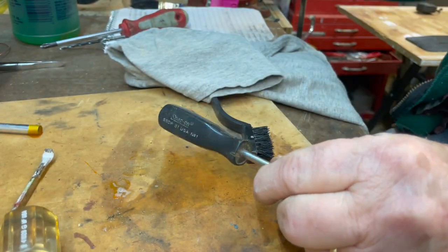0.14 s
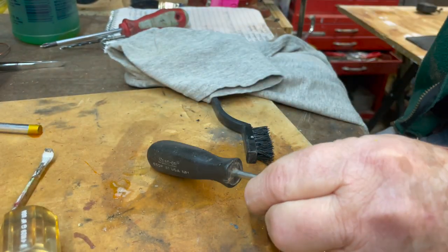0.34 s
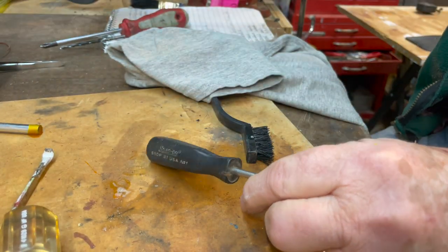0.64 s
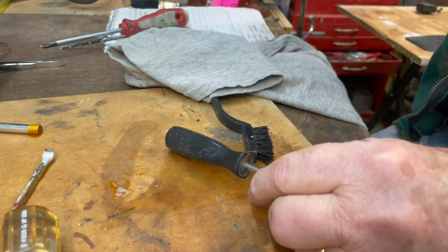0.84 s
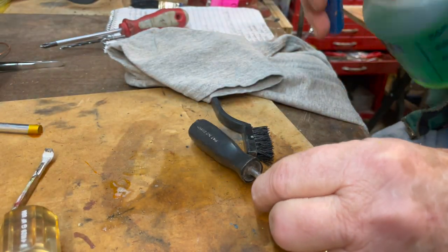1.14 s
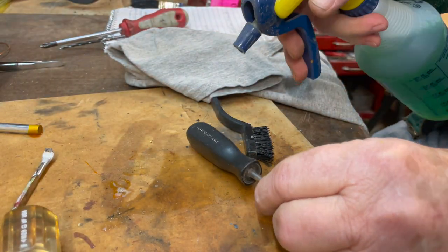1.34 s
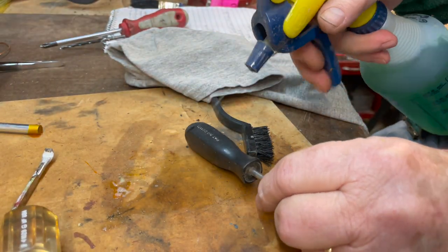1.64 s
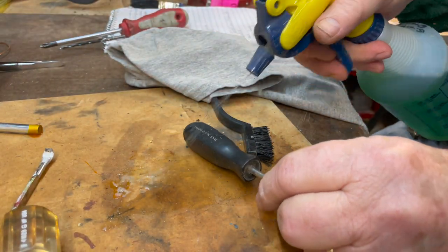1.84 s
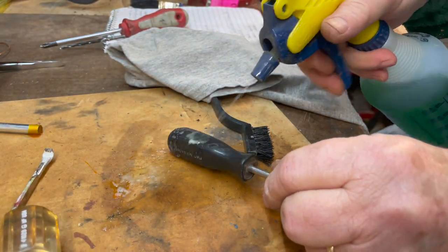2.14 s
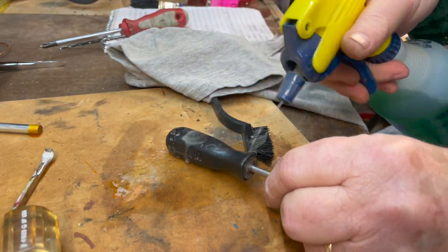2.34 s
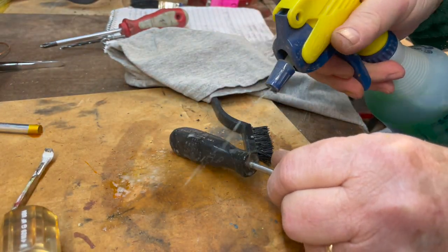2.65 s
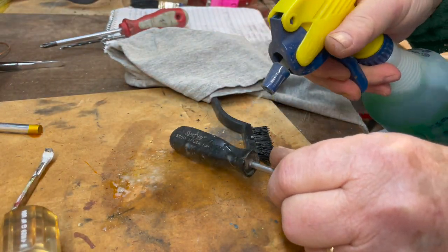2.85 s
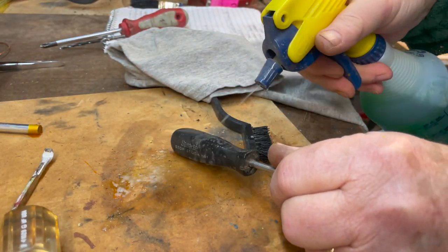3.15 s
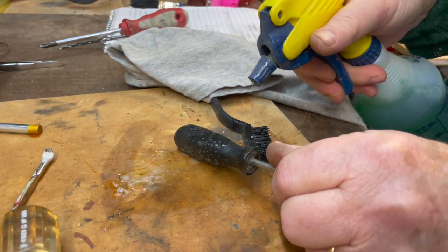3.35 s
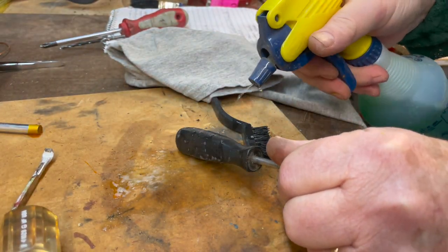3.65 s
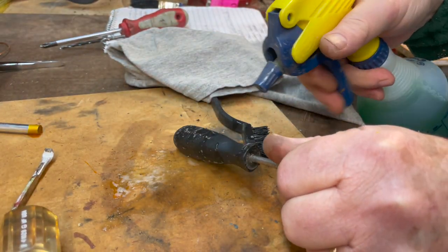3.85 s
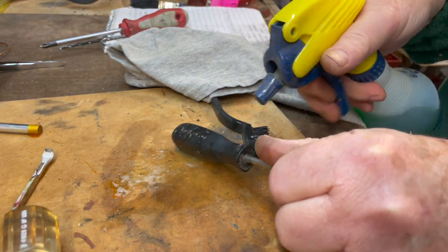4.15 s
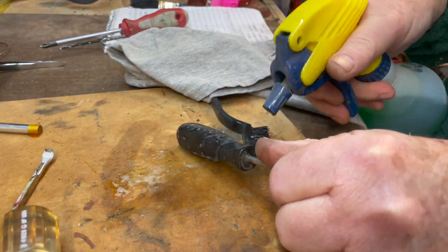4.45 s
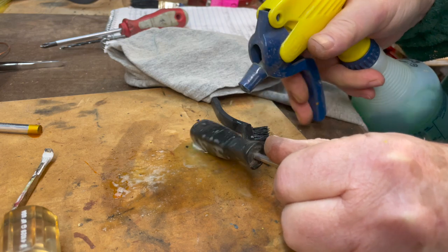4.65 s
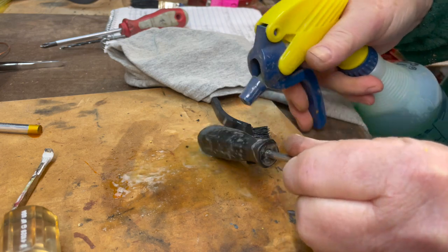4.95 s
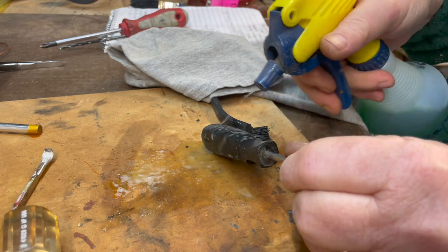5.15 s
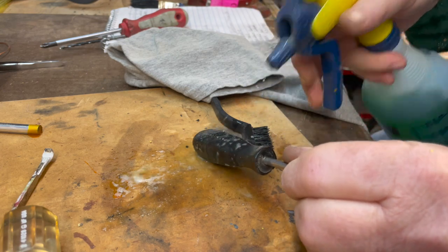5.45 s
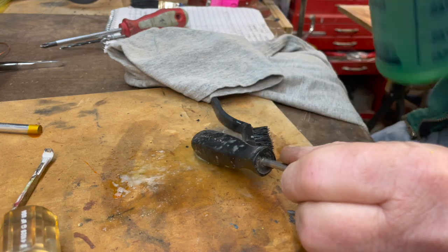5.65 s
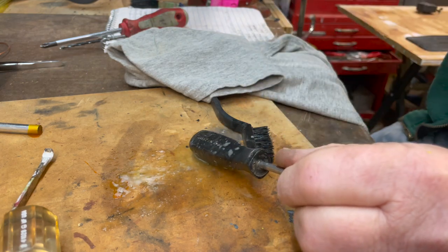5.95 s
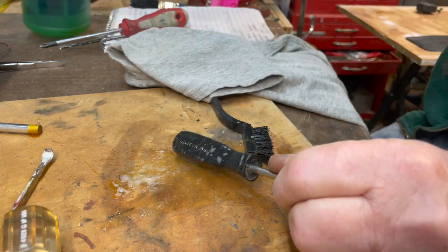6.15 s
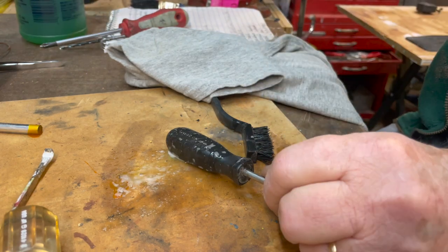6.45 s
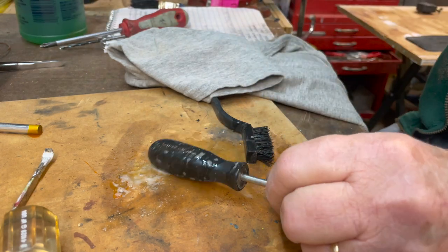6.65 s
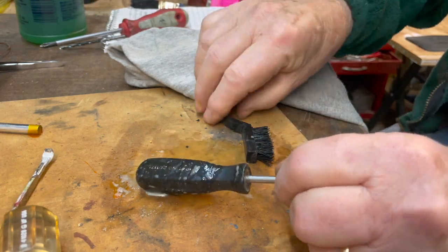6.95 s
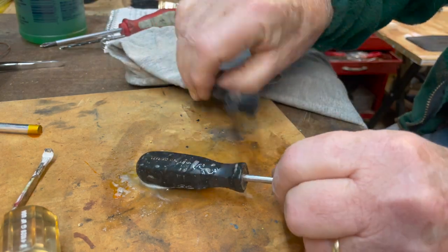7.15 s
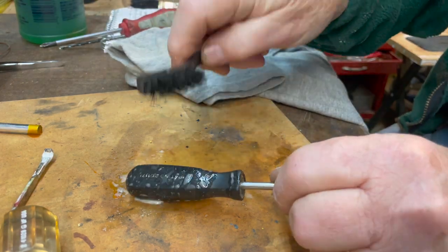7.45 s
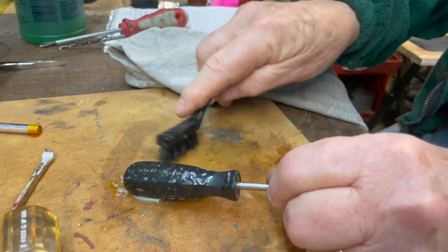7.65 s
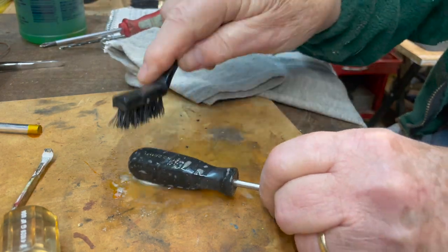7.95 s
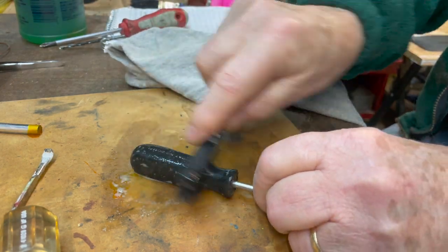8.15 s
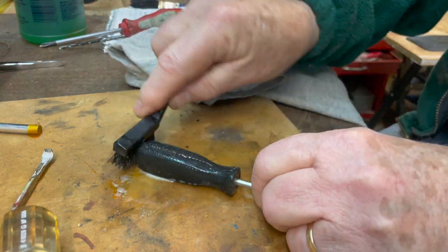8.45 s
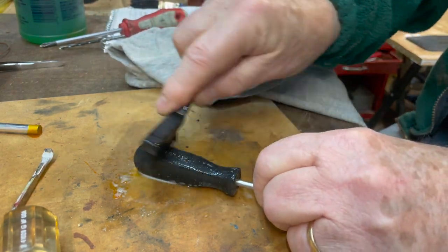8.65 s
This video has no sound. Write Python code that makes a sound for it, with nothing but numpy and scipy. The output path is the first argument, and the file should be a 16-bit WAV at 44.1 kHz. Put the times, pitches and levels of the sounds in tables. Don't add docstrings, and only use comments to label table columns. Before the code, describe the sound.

In a humming workshop, a trigger bottle squirts repeated hissing bursts with plastic clicks, is set down with a rattling thud, then a stiff brush scrubs.

```python
import sys
import numpy as np
from scipy import signal
from scipy.fft import rfft, irfft, next_fast_len
from scipy.io import wavfile
from scipy.ndimage import uniform_filter1d

SR = 44100
rng = np.random.default_rng(int(sys.argv[2]) if len(sys.argv) > 2 else 0)


def unload_audio(sound):
    columns = np.transpose(np.atleast_2d(sound))
    steps = np.round(np.clip(columns, -1, 1) * 32767)
    wavfile.write(sys.argv[1], SR, steps.astype(np.int16))


def boost(x):
    u = np.asarray(x, float) / 20
    return 10 ** u


N = 388521
SIZE = next_fast_len(N + SR)
HZ = np.arange(SIZE // 2 + 1) * SR / SIZE + 1e-3
TIME = np.arange(N) / SR

# pitch_hz, peak_db, phase_rad
MOTORS = [
    (56.53, -43.7, -2.74),
    (59.37, -56, .52),
]
# pitch_hz, level_db_per_hz
FAN = [(35, -100), (48, -67.5), (90, -73), (125, -86), (170, -76), (250, -82), (420, -79.5), (700, -83),
       (1500, -87), (3000, -98), (4000, -105), (7000, -113), (13000, -113), (16000, -120)]
# pitch_hz, width_hz, level_db
DUCT_RESONANCES = [(302.5, 62, 11.04), (342.5, 28, 11.7), (500, 24, 6.3), (1100, 460, 2.05),
                   (3220, 140, 5.9)]
ROOM_T60_S, ROOM_DB = 0.18, -7.5

# pitch_hz, right_leads_left_rad,
# likeness_0_to_1, left_minus_right_db
MICS = [(60.4, 0.42, 1, -1), (200, 0.3, 0.93, 1), (487, -0.9, 0.82, 1), (930, -2.5, 0.46, 0.5),
        (2980, -2, 0.7, 2.5), (4110, -1.98, 0.87, 3), (5880, -0.5, 0, 3.5), (7470, 4, 0.48, 2.5),
        (8400, 3.6, .8, 0), (9200, 3.14, .97, 0), (9900, 3.6, .8, 0), (10800, 4.2, .75, 0),
               (12000, 5.4, .85, 0), (12800, 2 * np.pi, .99, 0), (17000, 2 * np.pi, .99, 0)]
# pitch_hz, width_hz, level_db
CASE_DIPS = [(5700, 300, -9), (7500, 350, -6)]

# start_s, length_s, rub_db, brightness_db, fastest_place_0_to_1
RUSTLES = [(0, .06, -74, 0.1, .1), (0.206, .08, -68, 1, 0.3), (0.308, 0.076, -60, 3, 0),
           (0.381, 0.18, -58.5, -5, 0.14), (.76, 0.63, -68.5, -9, 0.2), (1.05, 0.3, -67, -4.5, 0.8),
           (5.7, .22, -86, -15, 0.1), (6.185, 0.13, -47, -4.5, 0), (6.284, 0.51, -66.5, 1, 0.42),
           (6.657, 0.13, -56, -10, 0.28), (6.965, 0.079, -50.5, 1, 0.75), (7.082, 0.25, -63, 0.5, 0.52),
           (7.292, 0.14, -58, -9, 0.55), (7.448, 0.13, -63.5, -5, 0.4), (7.61, 0.34, -63, -3, 0.4),
           (7.894, 0.13, -61.5, -4, 0.34), (8.05, 0.9, -62, -3, 0.44)]
# pitch_hz, level_db
CLOTH_COLOUR = [(300, -16), (600, -10.5), (1200, -15), (2200, -18), (4500, -15.5), (8500, -12.5),
                (15600, -9), (16200, -40)]
RUSTLE_ARCH = -11.5, -27, 0.0043
DRAG_DB, DRAG_PER_BRIGHT = 2, -0.59

# start_s, peak_db
NUDGES = [
    (2.56, -47.5),
    (3.219, -48),
    (4.929, -47),
    (5.091, -41),
    (6.665, -50),
    (7.122, -53),
    (4.35, -51.5),
]
NUDGE_SHARED = -49, 2.4, 0.87

# start_s, peak_db, upper_band_db, direct_minus_other_paths_db, ring_length_factor
KNOCKS = [
    (0.3222, -9.5, -22, 0, 1.5),
    (0.3635, -26, -75, 4.5, 1.0),
]
# start_s, peak_db, upper_band_db, direct_minus_other_paths_db, ring_length_factor
TAPS = [
    (1.012, -22.5, -39, 3, 1.1),
    (7.01, -35, -52, 2, 0.28),
    (7.681, -36, -56, 10, 4.2),
    (8.036, -32.5, -55, 6.4, 3.7),
]
# pitch_hz, level_db_per_hz
BENCH_TOP = [(59, -6), (100, -15), (420, -30), (550, 0), (800, -8), (1140, -5.5), (1400, -5.5), (2030, -14),
             (2360, -28), (2960, -12), (3400, -25), (5020, -23), (9000, -39), (11700, -64), (19800, -120)]
# pitch_hz, level_db_per_hz
BENCH_EDGE = [(150, -25), (400, -11), (530, 1.5), (750, -6.5), (1100, -1.5), (1500, -6.5), (2100, -13.5),
              (3000, -21), (4500, -28), (9000, -49)]
# start_s, left_db, right_db, pitch_hz
CONTACTS = [
    (0.3224, -3, -9, 1340),
    (0.3642, -22, -29, 1300),
    (1.0128, -15, -26, 1230),
    (8.4682, -12, -16, 1690),
]
CONTACT_CYCLES, FAR_PITCH = 1.23, 2.03

# start_s, length_s, bristle_hiss_db, pressure_db, fastest_place_0_to_1
STROKES = [
    (7.644, 0.16, -37, -41, 0.65),
    (8.028, 0.098, -40, -51.5, 0.33),
    (8.145, 0.13, -41.5, -50, 0.44),
    (8.259, 0.097, -36.5, -49.5, 0.3),
    (8.366, 0.11, -36, -50, 0.68),
    (8.485, 0.1, -35.5, -50, 0.32),
    (8.593, 0.094, -41.5, -54, 0.75),
    (8.701, 0.1, -40, -53.5, 0.33),
]
# pitch_hz, level_db
BRISTLE_COLOUR = [(120, -2), (300, -18), (550, -4.5), (1200, -18), (2200, -18), (3300, -19), (4500, -11),
                  (7000, -9.5), (10800, -7.5), (12300, -4), (13600, 4), (15750, 0.5), (16150, -48)]
STROKE_ARCH, DRUM_DB = (-13.5, -16, 0.0088), 3  # (start_db, end_db, edge_s), handle drumming over pressure
# start_s, peak_db, upper_band_db, direct_minus_other_paths_db, ring_length_factor
CLACK = [
    (8.467, -15, -18.5, 2.1, 1.14),
]
# pitch_hz, level_db_per_hz
HANDLE = [(180, -41), (300, -19), (603, -1), (910, -15), (1230, 3.5), (1880, -9), (2330, -0.5), (3180, -17),
          (5090, -11), (9000, -31), (11700, -69), (19800, -120)]

# start_s, peak_db, upper_band_db, direct_minus_other_paths_db, ring_length_factor
THUDS = [
    (6.1925, -20, -27.5, 3, 0.38),
    (6.198, -17.5, -24.5, 2, 0.29),
    (6.204, -18.5, -23, 1.5, 0.68),
    (6.215, -17.5, -29, 1.8, 0.58),
    (6.225, -27, -35, 1.6, 0.45),
    (6.232, -32, -43, 2, 0.46),
    (6.272, -25, -60, 3.6, 0.7),
]
# start_s, peak_db, upper_band_db, direct_minus_other_paths_db,
# ring_length_factor
ROCKS = [
    (6.238, -29, -30, 2, 0.55),
    (6.247, -27, -35, 2, 1),
    (6.255, -24.5, -36, 2.7, 0.93),
    (6.263, -23.5, -40, 3.3, .7),
    (6.281, -33, -46, 3, .9),
    (6.298, -35, -49, 2, 1),
    (6.313, -36, -51, 2, .9),
    (6.334, -43, -52, 2, .9),
]
# pitch_hz, level_db_per_hz
BOTTLE = [(41, -32), (70, -8.5), (152, 0.5), (378, -12.5), (492, -4), (600, -15), (800, -5.5), (1000, -6.5),
          (1360, -12.5), (1480, -23), (1700, -18), (2710, -28.5), (9000, -44.5), (11700, -71),
          (19800, -120)]
# pitch_hz, level_db_per_hz
RIM = [(120, -25), (300, -5), (600, -7), (1000, -4), (1400, -5.5), (2000, -13), (3200, -17), (5000, -27),
       (9000, -45)]

# start_s, peak_db, upper_band_db, direct_minus_other_paths_db
TICKS = [(1.6056, -32.5, -35.5, -1), (1.7335, -37.5, -48, 1), (1.8547, -30.5, -32, -7),
         (2.123, -36, -38, -8), (2.2523, -39, -43, -1), (2.387, -41, -45, -11), (2.5296, -34, -43, -7),
         (2.6606, -37, -47, -12), (2.9137, -49, -65, -7), (3.1754, -38, -46, -6), (3.4246, -38.5, -62, -3),
         (3.5687, -39.5, -52, 4), (2.2755, -44, -49, -6), (2.55, -50, -50, -5), (2.9332, -54, -58, -5),
         (3.36, -47, -45, -3), (3.5378, -46, -42.5, 5), (3.5957, -41, -45, 4), (4.2671, -52, -42, -5),
         (4.65, -56, -48, 0), (5.385, -44, -44, 2), (1.6095, -40, -40, -2), (3.711, -50, -63, 1),
         (3.9759, -47, -40.5, -4), (4.2547, -38, -46, -12), (4.3844, -52, -46, 5), (4.5468, -34, -37.5, -1),
         (4.6884, -33.5, -42.5, 3), (4.8612, -31, -38.5, 3), (5.0115, -41, -44, -3),
         (5.1327, -36.5, -44, -3), (5.37, -35, -40, -1), (5.475, -27, -29.5, -2), (5.7089, -45, -57, -1),
         (7.1856, -35, -42.5, 3)]
# pitch_hz, level_db_per_hz
TRIGGER = [(1300, 0.5), (1750, 2), (2000, 6.5), (2300, -1), (3200, -5), (4000, -6.5), (5000, -3),
           (5500, -25), (5900, -30)]
# start_s, peak_db, upper_band_db,
# direct_minus_other_paths_db
SNAPS = [(0.2226, -60, -56, 4), (0.763, -34, -34.5, 2), (0.9622, -44.5, -48, 1), (2.2672, -36, -26.5, -5),
         (3.7346, -44, -45, -8), (3.8531, -31.5, -31.5, -4), (4.138, -33.5, -22.5, -7),
         (4.564, -38, -43, -2), (4.714, -31.5, -28, -3), (5.024, -34.5, -27.5, -2), (5.4557, -45, -48, -6),
         (5.5718, -39.5, -31, 8), (6.6286, -35, -67, -1), (6.6663, -41, -49, -4), (6.9702, -43.5, -52, 5),
         (7.6131, -29, -36, -5), (7.6475, -31, -51, -6), (8.0336, -36, -35, -4), (8.0944, -56, -33, -1),
         (8.2665, -36, -32, -1), (8.3809, -49, -32, 1.5), (8.5864, -55, -32.5, 2.5),
         (8.7071, -43, -30.5, -1), (7.63, -50, -50, -4), (7.6795, -31, -46, -3), (7.808, -44, -38, 0),
         (8.075, -57, -38, 0), (8.245, -50, -38, 0), (8.2767, -36, -39, 3), (8.44, -52, -38, 0),
         (8.455, -45, -40, 0), (8.61, -52, -35, 0), (8.682, -46, -36, 0), (8.695, -53, -46, 0),
         (2.275, -40, -38, -5), (4.146, -38, -36, 1), (5.462, -41, -43, -2), (5.476, -39, -36.5, -6)]
# pitch_hz, level_db_per_hz
PLASTIC = [(1500, 4), (2500, 6.5), (4500, 0.5), (6500, 6.5), (8500, 3.5), (11000, -3), (13000, 1),
           (15000, -9), (16500, -17)]
TICK_RING, SNAP_RING = 0.72, 1.2
# start_s, peak_db, upper_band_db, direct_minus_other_paths_db, ring_length_factor
LATCH = [
    (1.478, -13.5, -14.5, 0.86, 0.74),
    (1.4854, -27.5, -26, 3, 1.5),
]
# pitch_hz, level_db_per_hz
LOCK = [(240, -29), (400, -25), (545, -5.5), (801, -21), (1220, -10), (1510, -19), (1930, -8), (2600, -9.5),
        (3400, -0.5), (4400, -6.5), (5780, -19), (8760, -8), (11900, -5), (16000, -9)]
# start_s, peak_db
VALVE = [(1.6057, -57), (1.8542, -52), (2.1231, -49), (2.3875, -47), (2.6604, -50), (2.9133, -50),
         (3.1744, -59), (3.4251, -50), (3.711, -48), (3.9759, -51), (4.2557, -52), (4.5466, -54),
         (4.8614, -57)]
# pitch_hz, level_db_per_hz
CHAMBER = [(1850, -11.5), (2000, 1), (2200, -6), (2350, -4), (2600, -23)]
VALVE_SHARED = -72, .1, 1.3

# start_s, length_s, nozzle_hiss_db, splash_db, hardest_place_0_to_1
SQUIRTS = [(1.472, 0.096, -56, -49, 0.1), (1.504, 0.25, -49.5, -61.5, 0.35), (1.742, 0.15, -39, -56, 0.62),
           (1.836, 0.15, -47, -55, 0.2), (1.997, 0.27, -44.5, -57.5, .35), (2.267, 0.28, -50, -59, .35),
           (2.523, 0.28, -52, -58, 0.47), (2.789, 0.22, -44.5, -59, 0.45), (3.054, .21, -48.5, -59, 0.57),
           (3.305, 0.32, -62.5, -59.5, 0.25), (3.567, 0.36, -60, -63, 0.33),
           (3.843, 0.31, -57, -62.5, 0.42), (4.134, 0.22, -48.5, -63.5, 0.57), (4.365, 0.1, -68, -64, 0.5),
           (4.423, 0.21, -63, -62, 0.3), (4.6, 0.14, -65, -63, 0.3), (4.713, 0.14, -59, -62, 0.5),
           (4.811, 0.16, -55.5, -60.5, .5), (4.928, 0.086, -61, -63, 0.6), (5.022, 0.21, -63, -65.5, 0.64),
           (5.24, 0.11, -64, -63, 0.45), (5.332, .15, -60, -64.5, 0.3), (5.47, 0.097, -68, -61, 0.3),
           (5.563, 0.12, -78, -64, 0)]
# pitch_hz, level_db
MIST_COLOUR = [(2500, -2.5), (4500, -11.5), (7000, -11.5), (10500, -11.5), (11500, -14.5), (12600, -6.5),
               (13600, -7.5), (14600, -8), (15750, -4), (16150, -53)]
HISS_ARCH = -10, -30, 0.043
SPLASH_ARCH = -11, -14.5, 0.016


def unit(x):
    return x / np.sqrt(np.mean(x ** 2))


def along(points, column=1):
    rows = np.array(points, float)
    return np.interp(np.log(HZ), np.log(rows[:, 0]), rows[:, column])


def bells(peaks):
    return sum(db / (1 + (2 * (HZ - hz) / width) ** 2) for hz, width, db in peaks)


def shape(x, gain):
    return irfft(rfft(x, SIZE) * gain, SIZE)[..., :N]


def above(hz):
    return 1 / (1 + (hz / HZ) ** 8)


def walk(rate):
    hold = int(SR / rate)
    steps = np.repeat(rng.standard_normal(N // hold + 1), hold)
    smooth = uniform_filter1d(uniform_filter1d(steps, hold), hold)
    return unit(smooth[:N])


def swells(rows, levels_db, start_db, end_db, edge_s):
    gains = np.zeros((len(levels_db), N))
    for (s, length, *_, place), db in zip(rows, np.transpose(levels_db)):
        span = slice(max(int(s * SR), 0), int((s + length) * SR))
        u = (TIME[span] - s) / length
        place = np.clip(place, .1, .9)
        rise = start_db * (1 - u / place) ** 2
        fall = end_db * ((u - place) / (1 - place)) ** 2
        arch = np.where(u < place, rise, fall)
        edges = np.clip(np.minimum(u, 1 - u) * length / edge_s, 0, 1)
        gains[:, span] += boost(db)[:, None] * boost(arch) * edges
    return gains


def friction(gains, colour, rate, spread_db, patchy_db):
    size = (rng.random(N) < rate / SR) * boost(spread_db * rng.exponential(size=N))
    slips = size * rng.standard_normal((2, N))
    tint = boost(along(colour))
    layers = [[17000, 14600, 13200, 11900, 10300, 8500], [8500, 5700, 4200, 2800], [2800, 1200, 20]]
    out = 0
    for gain, edges in zip(gains, layers):
        layer = 0
        for top, bottom in zip(edges, edges[1:]):
            band = shape(slips, tint * (above(bottom) - above(top)))
            layer = layer + band * boost(patchy_db * walk(30))
        out = out + unit(layer) * gain
    return out


def alike(rows, *shared):
    return [(*row, *shared) for row in rows]


def hits(events, colour, split_hz, t60_s, slope, crack_db, crack_s, push_s, count, size):
    out = np.zeros((2, N + SR))
    t = np.arange(size) / SR
    table = np.array(colour)
    points = np.log(table[:, 0])
    for s, low_db, high_db, path_db, length in events:
        draw = rng.random((3, 2, count, 1))
        place = points[0] + (points[-1] - points[0]) * (np.arange(count)[:, None] + draw[0]) / count
        hz = np.exp(place)
        gain = boost(np.interp(place, points, table[:, 1]) + 2.1 * draw[1]) * hz ** (.5 + slope / 2)
        fade = np.exp(-np.log(1000) * t / (t60_s * length * (1000 / hz) ** slope))
        push = 1 - np.exp(-t / push_s)
        crack = 1 + boost(crack_db) * np.exp(-t / crack_s)
        rings = gain * np.sin(2 * np.pi * (hz * t + 0.68 * draw[2])) * fade * push * crack
        low = (rings * (hz < split_hz)).sum(axis=1)
        high = (rings * (hz >= split_hz)).sum(axis=1)
        side = boost(np.array([[path_db], [-path_db]]) / 2)
        blow = side * boost(low_db) * low / abs(low).max() + boost(high_db) * high / abs(high).max()
        start = int((s + .0008) * SR)
        out[:, start:start + size] += boost(5.0) * blow
    return out[:, :N]


def shop():
    noise = rng.standard_normal((2, N))
    gain = boost(along(FAN) + bells(DUCT_RESONANCES)) * np.sqrt(SR / 2)
    swell = walk(0.96)
    out = 0
    for centre in np.arange(5, 14.5, .5):
        band = np.cos(np.pi * np.clip(np.log2(HZ) - centre, -.5, .5)) ** 2
        out = out + shape(noise, gain * band) * boost(.4 * swell + .9 * walk(6))
    return out


def hum():
    return sum(boost(db) * np.cos(2 * np.pi * hz * TIME + phase) for hz, db, phase in MOTORS)


def room(x):
    t = np.arange(SR // 2) / SR
    tail = rng.standard_normal((2, len(t))) * np.exp(-np.log(1000) * t / ROOM_T60_S) * (t > .004)
    tail = tail / np.sqrt((tail ** 2).sum(axis=1, keepdims=True))
    return shape(x, rfft(tail, SIZE) / (1 + HZ / 5000)) * boost(ROOM_DB)


def microphones(x, sharper):
    table = MICS
    like = np.clip(along(table, column=2), .01, .999) ** sharper
    turn = np.exp(.5j * along(table, column=1)) * boost(-along(table, column=3) / 2)
    direct, other = rfft(x, SIZE)
    left = direct / turn
    right = (like * direct + np.sqrt(1 - like ** 2) * other) * turn
    return irfft([left, right], SIZE)[:, :N]


def sleeves():
    _, _, rub, bright, _ = np.transpose(RUSTLES)
    drag = rub + DRAG_DB + DRAG_PER_BRIGHT * bright
    gains = swells(RUSTLES, [rub + bright, rub, drag], *RUSTLE_ARCH)
    return friction(gains, CLOTH_COLOUR, 14000, 2.1, 2.5)


def nudges():
    panel = np.array(CHAMBER) * [.27, 1]
    return hits(alike(NUDGES, *NUDGE_SHARED), panel, 580, 0.15, .1, -7, .002, 0.0027, count=8, size=6000)


def bench():
    knocks = hits(KNOCKS, BENCH_TOP, 2400, 0.068, 0.35, 10, 0.0019, .0002, count=90, size=5000)
    taps = hits(TAPS, BENCH_EDGE, 2400, 0.061, 0.66, 10.4, 0.0032, 0.0009, count=70, size=5000)
    return knocks + taps


def first_contacts():
    out = np.zeros((2, N))
    t = np.arange(400) / SR
    for s, left_db, right_db, hz in CONTACTS:
        pitch = hz * np.array([[1], [FAR_PITCH]])
        level = boost(np.array([[left_db], [right_db]])) * np.array([[-1], [1]])
        start = int(s * SR)
        wave = np.sin(2 * np.pi * pitch * t) * np.exp(-t * pitch / CONTACT_CYCLES)
        out[:, start:start + len(t)] += level * wave
    return out


def bristles():
    _, _, hiss, pressure, _ = np.transpose(STROKES)
    gains = swells(STROKES, [hiss, pressure, pressure + DRUM_DB], *STROKE_ARCH)
    return friction(gains, BRISTLE_COLOUR, 12000, 2.6, 3.2)


def brush_clack():
    return hits(CLACK, HANDLE, 2400, 0.07, 0.85, 8.7, 0.0039, 0.00067, count=100, size=5000)


def bottle_set_down():
    thuds = hits(THUDS, BOTTLE, 1700, 0.12, 0.36, 0, 0.0021, 0.00038, count=60, size=6000)
    rocks = hits(ROCKS, RIM, 1700, 0.099, 0.33, 3.3, 0.0015, 0.00035, count=50, size=5000)
    return thuds + rocks


def trigger():
    latch = hits(LATCH, LOCK, 8000, 0.11, 0.88, 6.5, 0.0011, 0.00029, count=80, size=5000)
    ticks = hits(alike(TICKS, TICK_RING), TRIGGER, 3000, 0.11, 0.27, 12.7, 0.00033, 0.000083,
                 count=24, size=3000)
    snaps = hits(alike(SNAPS, SNAP_RING), PLASTIC, 8500, 0.096, 0.44, 10.6, 0.00059, .0001,
                 count=140, size=1500)
    valve = hits(alike(VALVE, *VALVE_SHARED), CHAMBER, 2100, 0.088, .1, -3, 0.0022, 0.0015,
                 count=8, size=4000)
    return latch + ticks + snaps + valve


def spray():
    _, _, hiss, splash, _ = np.transpose(SQUIRTS)
    gains = [*swells(SQUIRTS, [hiss], *HISS_ARCH), *swells(SQUIRTS, [splash], *SPLASH_ARCH)]
    return friction(gains, MIST_COLOUR, 14000, 2.5, 4.0)


def scene():
    background = microphones(shop(), 4.4) + hum()
    blows = nudges() + bench() + brush_clack() + bottle_set_down() + trigger()
    rubbing = sleeves() + bristles() + spray()
    near = microphones(blows, 0.88) + microphones(rubbing, 1.0) + first_contacts()
    return background + microphones(room(blows), 1.0) + near


def band_limit(x):
    return signal.sosfilt(signal.butter(12, 16670, fs=SR, output="sos"), x)


def record(dry):
    passed = above(33.0) * (1 - above(12930) ** 2)
    mix = shape(dry, boost(bells(CASE_DIPS)) * passed)
    return band_limit(mix)


dry = scene()
out = record(dry)
unload_audio(out)
```